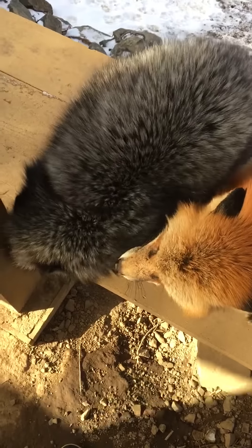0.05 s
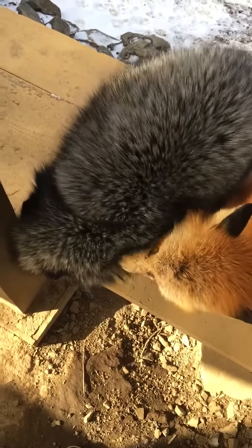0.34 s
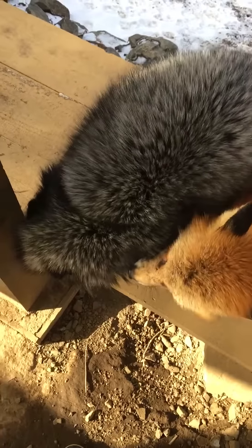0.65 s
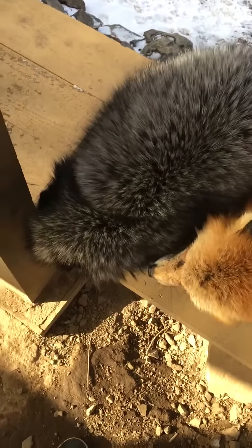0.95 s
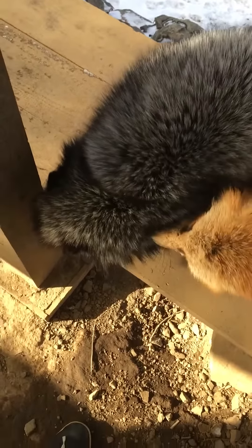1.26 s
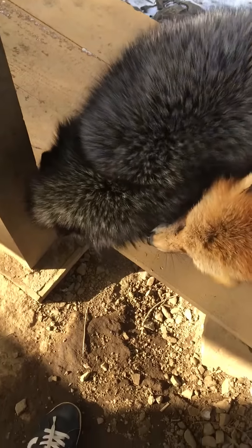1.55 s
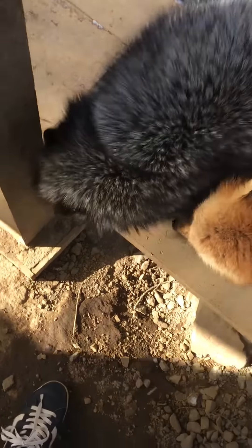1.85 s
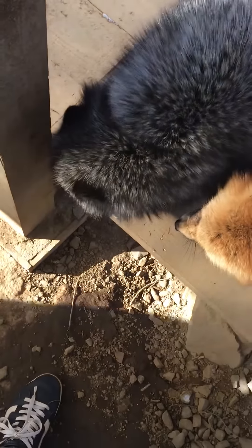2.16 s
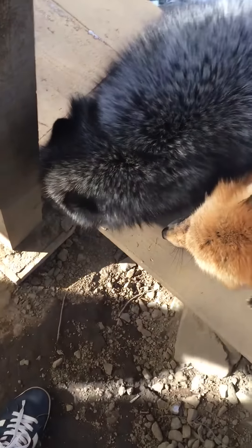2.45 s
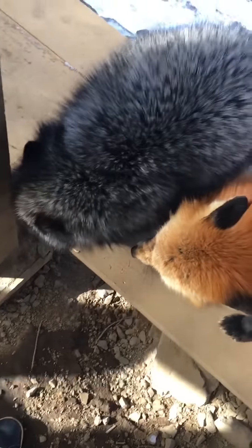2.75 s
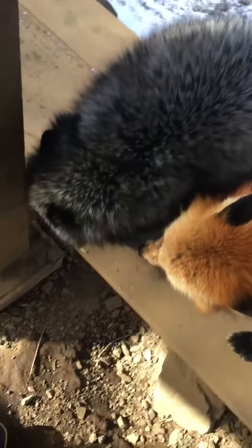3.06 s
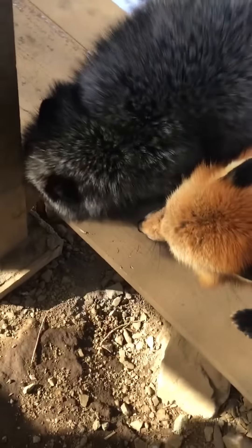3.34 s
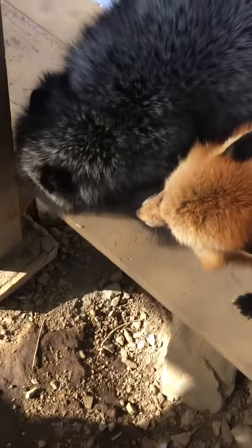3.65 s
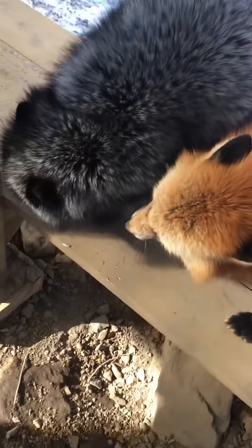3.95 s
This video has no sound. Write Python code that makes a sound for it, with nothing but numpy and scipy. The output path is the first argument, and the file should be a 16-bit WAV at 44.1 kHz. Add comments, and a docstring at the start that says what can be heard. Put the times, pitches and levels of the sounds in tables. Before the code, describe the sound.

Foxes quarrel close by outdoors. A sharp, falling bark opens into a high, wavering whine lasting until 1.2 seconds. Barks come at 1.5 and 1.8 seconds, then a second, sometimes hoarse whine holds until 3.1. Three more barks follow at about 3.3, 3.6 and 3.9 seconds. Wooden boards knock dully near 2.1 and 3.3 seconds, with faint paw scuffs. Wind buffets the microphone, most strongly after 3 seconds.

```python
"""Foxes quarrelling on a wooden platform

Six sharp barks drop in pitch close to the microphone; two run on into long, wavering whines.
Each call follows the source-filter principle: vocal folds make harmonics, throat and mouth shape them.
The boards throw back short echoes and are knocked and scuffed now and then.
Wind buffets the microphone, and another fox whines faintly far away."""
import sys
import numpy as np
from scipy import signal
from scipy.fft import rfft, irfft, next_fast_len
from scipy.io import wavfile

SR = 44100
rng = np.random.default_rng(int(sys.argv[2]) if len(sys.argv) > 2 else 0)


def bounce(signal):
    """Save signal as a 16-bit WAV file at the path given by the first command-line argument."""
    frames = np.transpose(np.atleast_2d(signal))
    limited = np.clip(frames, -1, 1)
    pcm = np.round(limited * 32767).astype(np.int16)
    wavfile.write(sys.argv[1], SR, pcm)


N = 176400
T = np.arange(N) / SR
CUTOFF_HZ = 15800


def from_db(db):
    """Amplitude ratio: a factor of ten per 20 dB."""
    return 10 ** (np.asarray(db) / 20)


def unit_power(x):
    """Normalisation to a mean square of 1."""
    return x / np.sqrt(np.mean(x ** 2) + 1e-20)


def in_time(rows, t):
    """Linear interpolation of each column at times t."""
    times, *columns = np.transpose(rows)
    return [np.interp(t, times, column) for column in columns]


def level_at(spectrum, hz):
    """Spectral envelope in dB, interpolated over log frequency."""
    points_hz, db = np.transpose(spectrum)
    return np.interp(np.log(np.maximum(hz, 1)), np.log(points_hz), db)


def coloured(x, spectrum):
    """Filtering by multiplication of spectra, at unit power."""
    size = next_fast_len(len(x))
    gain = from_db(level_at(spectrum, np.fft.rfftfreq(size, 1 / SR)))
    return unit_power(irfft(rfft(x, size) * gain, size)[:len(x)])


def drift(corner_hz, t):
    """Random modulation: low-passed noise with a spread of about 1."""
    pole = np.exp(-20 * np.pi * corner_hz / SR)
    slow = signal.lfilter([1], [1, -2 * pole, pole * pole], rng.standard_normal(N // 10 + 2000))[2000:]
    return np.interp(t * SR / 10, np.arange(len(slow)), unit_power(slow))


def swell(centre_s, half_s):
    """Gaussian envelope in time."""
    return np.exp(-((T - centre_s) / half_s) ** 2)


def resonance(hz, centre_hz, octaves):
    """Resonance peak of height 1, Gaussian in log frequency."""
    return np.exp(-(np.log2(hz / centre_hz) / octaves) ** 2)


# Gusts: centre_s, half_length_s, level_db
GUSTS = [(0.33, 0.23, -44.5), (1.18, 0.055, -40), (1.67, 0.024, -25.5), (2.01, 0.039, -29),
         (2.12, 0.07, -35.5), (2.5, 0.093, -45), (2.711, 0.023, -27), (2.952, 0.08, -43),
         (3.172, 0.02, -20), (3.281, 0.058, -19), (3.36, 0.04, -23.5), (3.534, 0.013, -26.5),
         (3.693, 0.028, -19), (3.779, 0.021, -36), (3.853, 0.019, -31.5), (3.923, 0.017, -27)]
# Spectra of the buffeting and the outdoor hush: frequency_hz, relative_density_db
WIND_SPECTRUM = [(20, -34), (45, 1), (100, 3), (150, -2.5), (230, -11), (330, -19), (500, -37), (1000, -54),
                 (3000, -93)]
HUSH_SPECTRUM = [(30, -1), (200, -0.5), (500, -12), (1500, -17.5), (2500, -21), (4000, -26),
                 (9000, -34.5), (15500, -40.5)]
BREEZE_DB, HUSH_DB = -58, -48


def wind():
    """Turbulent pressure on the microphone makes low buffets over a steady hush."""
    force = from_db(BREEZE_DB) + sum(from_db(db) * swell(s, half) for s, half, db in GUSTS)
    buffets = force * coloured(rng.standard_normal(N), WIND_SPECTRUM)
    return buffets + from_db(HUSH_DB) * coloured(rng.standard_normal(N), HUSH_SPECTRUM)


# Paw scuffs: centre_s, half_length_s, level_db
SCUFFS = [(1.665, 0.011, -48), (3.503, 0.026, -55), (3.585, .025, -46), (3.802, 0.0035, -58)]
# Their spectrum: frequency_hz, relative_density_db
SCUFF_SPECTRUM = [(300, -1), (900, 3), (2500, -10), (6000, -13.5), (15000, -21)]
# Dull knocks: start_s, level_db
KNOCKS = [(2.069, -17), (3.346, -8)]
# Modes of the boards: frequency_hz, gain_db, t60_s
BOARD_MODES = [(87, -17, 0.058), (167, 3, 0.023), (290, -17, 0.031)]


def platform():
    """Friction of paws makes noise; impacts excite the damped modes of the boards."""
    friction = sum(from_db(db) * swell(s, half) for s, half, db in SCUFFS)
    out = friction * coloured(rng.standard_normal(N), SCUFF_SPECTRUM)
    for start, db in KNOCKS:
        age = np.clip(T - start, 0, .5)
        for hz, mode_db, t60 in BOARD_MODES:
            out += from_db(db + mode_db - 60 * age / t60) * np.sin(2 * np.pi * hz * age)
    return out


# Reflections off the boards: delay_s, gain_db
BOARD_ECHOES = [(.0031, -19.5), (.0083, -19.5)]
SHELTER_DB, SHELTER_T60_S, YARD_DB, YARD_T60_S = -23, 0.26, -41, 0.52


def with_echoes(x):
    """Direct sound, early reflections and the exponential reverberation of shelter and yard."""
    early = sum(from_db(db) * np.interp(T - delay, T, x, left=0) for delay, db in BOARD_ECHOES)
    age, response = T[:SR], 0
    dulling = signal.butter(1, 5100, fs=SR, output="sos")
    for db, t60 in ((SHELTER_DB, SHELTER_T60_S), (YARD_DB, YARD_T60_S)):
        tail = signal.sosfilt(dulling, rng.standard_normal(SR)) * from_db(-60 * age / t60) * (age > .005)
        response = response + from_db(db) * unit_power(tail) / np.sqrt(SR)
    return x + early + signal.fftconvolve(x, response)[:N]


def breath(phase, throat):
    """Turbulent hiss, pulsed by each cycle of the vocal folds and filtered by the throat."""
    hiss = coloured(rng.standard_normal(len(phase)) * (1 + np.cos(phase)), throat)
    for order, corner_hz in ((2, 600), (1, 4500)):
        hiss = signal.sosfilt(signal.butter(order, corner_hz, "high", fs=SR, output="sos"), hiss)
    return unit_power(hiss)


TREBLE_HZ, BITE_HZ = 3240, 3067  # corner of the treble shelf; resonance that gives a call its bite
JITTER_HZ, SHIMMER_HZ, FLUTTER_HZ = 120, 88, 30
RELEASE_S = 0.024


def voice(t, pitch, throat, mouth_hz, mouth_db, bite_db, treble_db,
          jitter, shimmer, rasp_db, scatter, scatter_hz):
    """Source and filter: fold cycles vary in period (jitter) and size (shimmer); formants shape them."""
    phase = 2 * np.pi * np.cumsum(pitch * (1 + jitter * drift(JITTER_HZ, t))) / SR
    tone, power = 0, 1e-12
    for k in range(1, int(CUTOFF_HZ / pitch.min()) + 1):
        hz = k * pitch
        formants = mouth_db * resonance(hz, mouth_hz, 0.26) + bite_db * resonance(hz, BITE_HZ, 0.18)
        shelf = treble_db / (1 + (TREBLE_HZ / hz) ** 10)
        # Each harmonic flickers in level and phase, the high ones most.
        wander = drift(scatter_hz, t) + 1j * drift(scatter_hz, t)
        flicker = 1 + scatter * np.minimum(hz / TREBLE_HZ, 2) * wander / 2
        flutter = 1 + .22 * np.minimum(hz / TREBLE_HZ / 2, 1.5) * drift(FLUTTER_HZ, t)
        gain = from_db(level_at(throat, hz) + formants + shelf) * flicker * flutter * (hz < SR / 2)
        tone = tone + np.real(gain * np.exp(1j * (k * phase + 2 * np.pi * rng.random())))
        power = power + np.abs(gain) ** 2 / 2
    rasp = from_db(rasp_db) * breath(phase, throat)
    return tone / np.sqrt(power) * (1 + shimmer * drift(SHIMMER_HZ, t)) + rasp


def gate(t, start, end, attack_s):
    """Trapezoidal envelope: the voice starts, holds and stops."""
    return np.clip((t - start) / attack_s, 0, 1) * np.clip((end - t) / RELEASE_S + .5, 0, 1)


# Throat response, shared with the second near whine: frequency_hz, gain_db
WHINE_THROAT = [(720, -7.5), (1450, 1.5), (2200, -0.5), (2900, -5), (3650, -5), (4300, -8), (5100, -9.5),
                (5800, -10.5), (6450, -24), (7200, -23.5), (7900, -29), (9300, -32), (11000, -40),
                (15000, -36)]
# Distant whine: time_s, pitch_hz
FAR_PITCH = [(3.1, 645), (3.3, 633), (3.45, 624), (3.55, 602), (3.78, 590)]
FAR_DB = -60


def far_fox():
    """Attenuation with distance leaves a whine from across the yard faint and dull."""
    on = (T > FAR_PITCH[0][0]) & (T < FAR_PITCH[-1][0])
    t, out = T[on], np.zeros(N)
    cry = voice(t, in_time(FAR_PITCH, t)[0], WHINE_THROAT, mouth_hz=1850, mouth_db=11, bite_db=2.5,
                treble_db=-20, jitter=0.012, shimmer=0.6, rasp_db=-28, scatter=0.77, scatter_hz=15)
    out[on] = from_db(FAR_DB) * signal.windows.tukey(len(t), .2) * cry
    return out


# Pitch contours of the two whines: time_s, pitch_hz
FIRST_PITCH = [(0.16, 804), (0.21, 794), (0.258, 815.6), (0.316, 871), (0.33, 883), (0.42, 839.5),
               (0.498, 807.7), (0.64, 781.5), (0.7, 731.5), (0.77, 758.7), (0.868, 733.6), (0.932, 752.7),
               (0.98, 737.5), (1.058, 787.0), (1.13, 873.2), (1.178, 907), (1.224, 814), (1.236, 831),
               (1.24, 854.5)]
SECOND_PITCH = [(1.875, 712.8), (1.891, 732.6), (1.921, 719), (1.991, 746.5), (2.061, 721), (2.129, 743.3),
                (2.207, 685), (2.223, 677), (2.253, 714), (2.269, 690), (2.279, 732), (2.299, 731),
                (2.347, 803), (2.411, 733), (2.501, 709.5), (2.649, 719), (2.819, 714), (2.901, 722.5),
                (2.961, 704), (3.011, 736.6), (3.061, 700.6), (3.08, 722)]
# Vocal effort: time_s, level_db, treble_share_db, bite_share_db, mouth_hz
FIRST_EFFORT = [(0.15, -29, -18, -34, 1760), (0.264, -21.5, -15.5, -16, 1860), (0.316, -25, -19, -17, 1950),
                (0.352, -17.5, -14, -13, 1980), (0.378, -17.5, -22.5, -3, 2080),
                (0.46, -26.5, -17, -18, 1890), (0.542, -21.5, -20, -14, 2270), (0.63, -20, -22.5, -9, 2320),
                (0.656, -22.5, -16.5, -16, 1840), (0.672, -23.5, -16.5, -33, 1450),
                (0.74, -21.5, -15.5, -28.5, 1500), (0.976, -21.5, -12.5, -27, 1500),
                (1.012, -21.5, -17, -40, 1510), (1.046, -21.5, -13, -15, 1616),
                (1.11, -19.5, -15.5, -8, 1747), (1.146, -23.5, -6, -32, 1810), (1.202, -16, -14, -11, 1920),
                (1.235, -24.5, -18, -28, 1920)]
SECOND_EFFORT = [(1.86, -27, -13, -19, 2080), (1.866, -32.5, 0, -7, 2140), (1.9, -24, -6, -16.5, 2180),
                 (2.152, -24, -6, -25.5, 2240), (2.188, -25, -9, -8, 1630), (2.226, -28, -3.5, -13, 1390),
                 (2.266, -39.5, -7.5, -7, 1810), (2.304, -34, -2, -24, 2160), (2.328, -42, -6, -19, 1960),
                 (2.412, -24.5, -8, -14, 2200), (2.498, -23.5, -7, -5, 2040),
                 (2.708, -23.5, -5.5, -14.5, 1920), (2.974, -24.5, -12, -25, 1807),
                 (3.012, -28, -4, -27, 2160), (3.068, -24, -15.5, -30, 1650), (3.08, -33, -2, -21, 1584)]
# Throat response of the first whine: frequency_hz, gain_db
FIRST_THROAT = [(730, -5), (880, 0.5), (1150, 0), (1550, -4), (2400, -4), (3100, -1.5), (4000, -16),
                (4500, -14), (5600, -11.5), (6600, -23.5), (7500, -26), (9200, -27), (12000, -31.5),
                (15500, -39)]
# Hoarse moments: centre_s, half_length_s, added_roughness
STRAINS = [(.31, .04, 2.2), (1.17, .07, 3.2), (2.27, .055, 4.5), (3.07, .025, 4)]
# Whines: contour, effort, throat, usual_treble_db, usual_bite_db
WHINES = [(FIRST_PITCH, FIRST_EFFORT, FIRST_THROAT, -11.5, -14),
          (SECOND_PITCH, SECOND_EFFORT, WHINE_THROAT, -7, -15.5)]


def whines():
    """Sustained phonation: nearly periodic folds sound clear, and turn irregular under strain."""
    out = np.zeros(N)
    strain = 1 + sum(added * swell(s, half) for s, half, added in STRAINS)
    for contour, effort, throat, usual_treble_db, usual_bite_db in WHINES:
        start, end = effort[0][0], effort[-1][0]
        on = (T >= start) & (T < end + RELEASE_S)
        t, rough = T[on], strain[on]
        pitch = in_time(contour, t)[0] * (1 + 0.0018 * drift(20, t))
        db, treble_db, bite_db, mouth_hz = in_time(effort, t)
        cry = voice(t, pitch, throat, mouth_hz, mouth_db=8.9, bite_db=bite_db - usual_bite_db,
                    treble_db=treble_db - usual_treble_db, jitter=.0021 * rough, shimmer=.025 * rough,
                    rasp_db=-38 + 20 * np.log10(rough), scatter=0.49, scatter_hz=7.1)
        out[on] += from_db(db) * gate(t, start, end, attack_s=0.01) * cry
    return out


# Barks: start_s, length_s, top_pitch_hz, bottom_pitch_hz, fall_s, fall_lateness, rebound_hz_per_s,
# onset_db, peak_after_s, peak_db, tail_db, mouth_hz, bite_db, treble_db
BARKS = [(.038, 0.12, 907, 663, 0.064, 1.88, 2180, -18.5, 0.023, -11.5, -23, 1930, 8, -3.5),
         (1.477, 0.085, 965, 679, 0.066, 1.04, 1760, -22.5, 0.021, -13, -25.5, 2220, 8, -3.5),
         (1.765, 0.1, 929, 578.4, 0.065, 0.97, 2830, -21.5, 0.037, -19, -23, 1930, -13, 0),
         (3.32, 0.071, 880, 637, 0.047, 1.31, 890, -25, 0.0093, -19, -20, 1970, 5, -2.5),
         (3.593, 0.093, 741, 443, .076, 1.3, 1200, -18.5, 0.02, -15, -25.5, 1940, -2, -2.5),
         (3.883, 0.16, 988, 709, 0.061, 0.91, 1360, -22.5, 0.032, -19, -22, 1840, -6.5, -1)]
# Throat response in a bark: frequency_hz, gain_db
BARK_THROAT = [(450, -13), (620, -11.5), (850, -4), (1100, -6), (1700, 0.5), (2400, -2.5), (3400, 2),
               (3900, -15), (5400, -11.5), (6100, -18), (6700, -27), (8500, -30.5), (11000, -40.5),
               (15500, -41)]
DROP_S, TAIL_DB_PER_S = 0.032, 97  # quick drop after the peak, then a slower fade
OPENING_DB_PER_S, DULLING_DB, BITE_LOSS_DB, CLOSING_HZ = 194, 8, 25, 200
RASP_DB, CLEARING_S, BURST_DB, BURST_S = -15, .11, 11, .007  # a bark cracks open with extra rasp


def barks():
    """Abrupt phonation starts high and rough; as pitch falls, the closing mouth lowers its formant."""
    out = np.zeros(N)
    for (start, length, top, bottom, fall_s, lateness, rebound,
         onset_db, peak_s, peak_db, tail_db, mouth_hz, bite_db, treble_db) in BARKS:
        on = (T >= start) & (T < start + length + RELEASE_S)
        t, age = T[on], T[on] - start
        progress = np.minimum(age / fall_s, 1)
        fallen = np.sin(np.pi / 2 * progress ** lateness)
        pitch = top - (top - bottom) * fallen + rebound * np.maximum(age - fall_s, 0)
        db = np.interp(age, [0, peak_s, peak_s + DROP_S], [onset_db, peak_db, tail_db])
        db -= TAIL_DB_PER_S * np.maximum(age - peak_s - DROP_S, 0)
        closed, rough = fallen ** 2, np.exp(-age / CLEARING_S)
        treble = treble_db - DULLING_DB * closed - OPENING_DB_PER_S * np.maximum(peak_s - age, 0)
        rasp_db = RASP_DB + 20 * np.log10(rough) + treble_db / 2 + BURST_DB * np.exp(-age / BURST_S)
        cry = voice(t, pitch, BARK_THROAT, mouth_hz - CLOSING_HZ * closed, mouth_db=5,
                    bite_db=bite_db - BITE_LOSS_DB * progress ** 2, treble_db=treble,
                    jitter=.011 * rough, shimmer=.2 * rough, rasp_db=rasp_db, scatter=1, scatter_hz=53)
        out[on] += from_db(db) * gate(t, start, start + length, attack_s=.002) * cry
    return out


def scene():
    """Superposition of the echoing calls, wind and boards in one channel."""
    calls = barks() + whines() + far_fox()
    return (with_echoes(calls) + wind() + platform())[None]


def record(dry):
    """Band limiting: an elliptic low-pass cuts the top steeply."""
    return signal.sosfilt(signal.ellip(12, .1, 90, CUTOFF_HZ, fs=SR, output="sos"), dry)


dry = scene()
out = record(dry)
bounce(out)
```